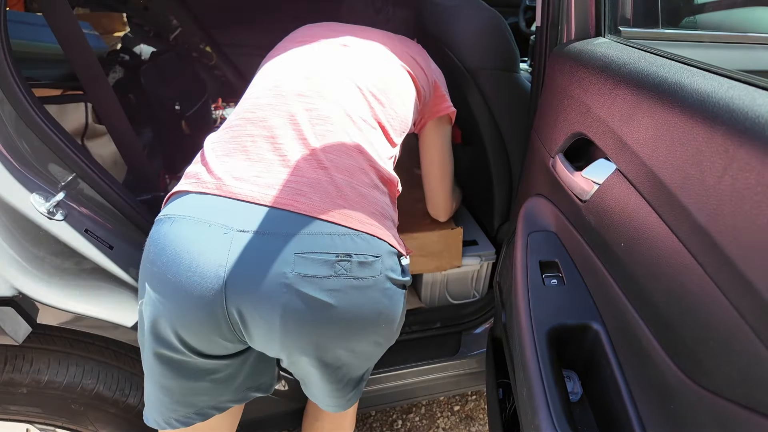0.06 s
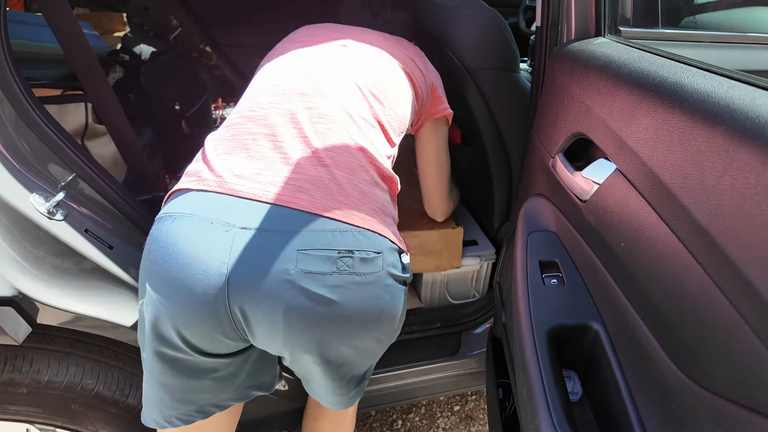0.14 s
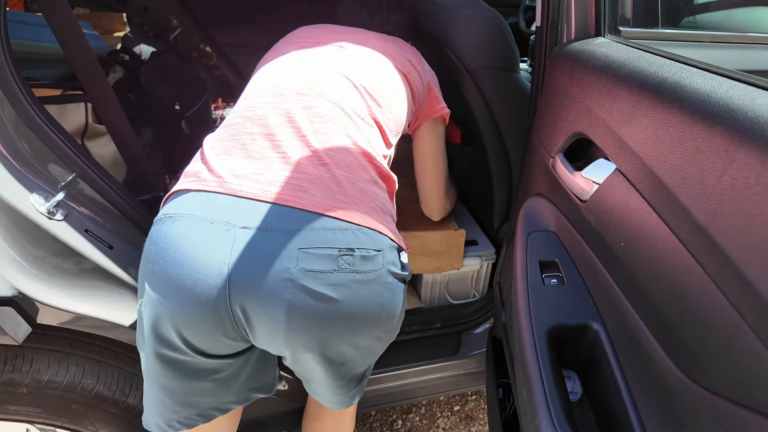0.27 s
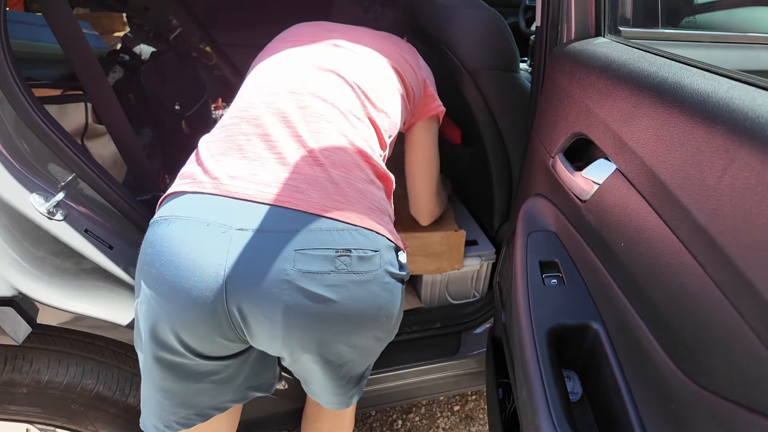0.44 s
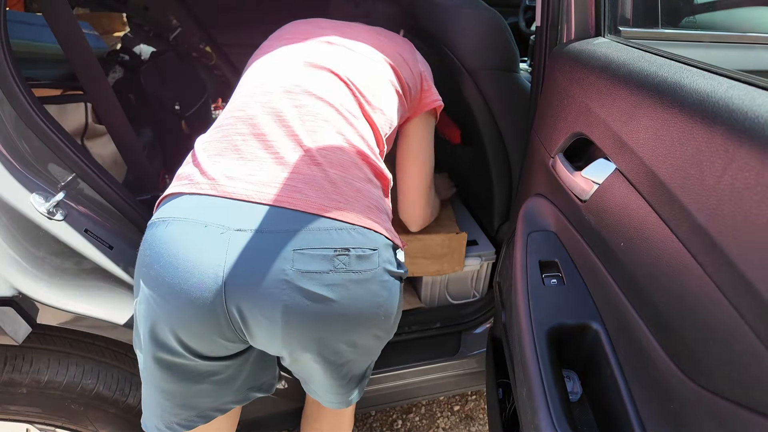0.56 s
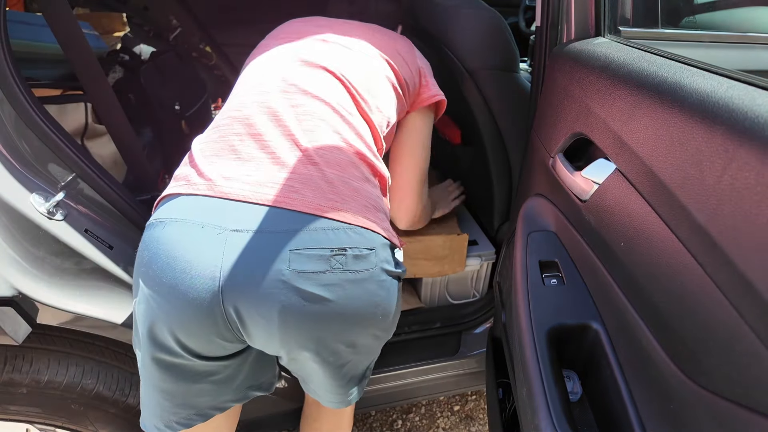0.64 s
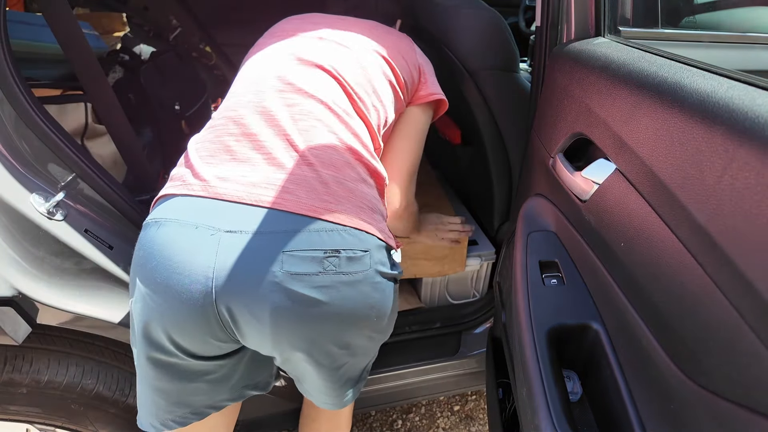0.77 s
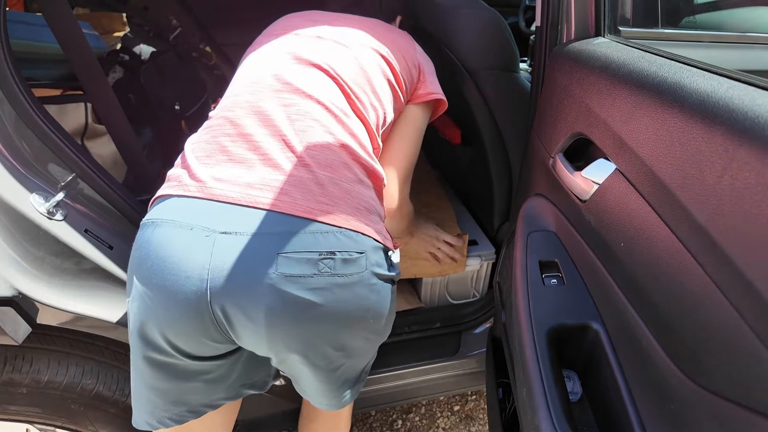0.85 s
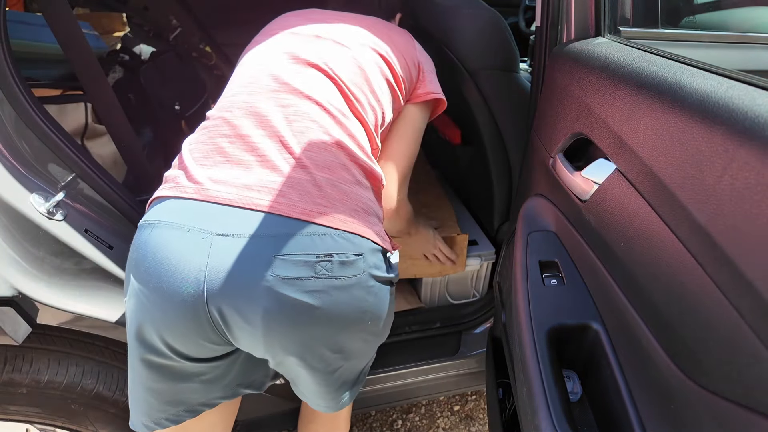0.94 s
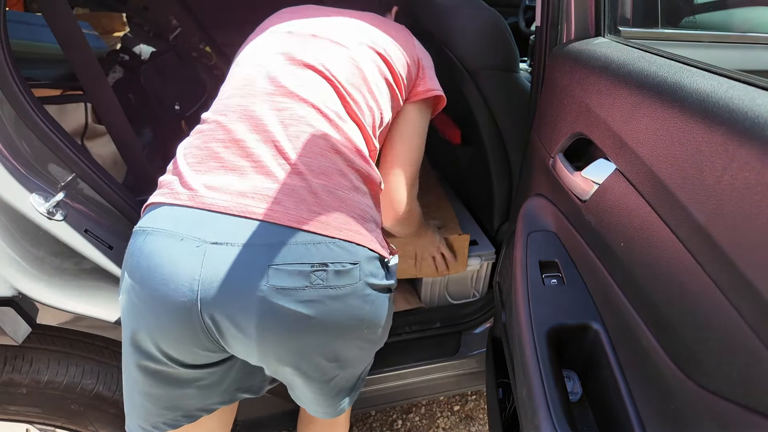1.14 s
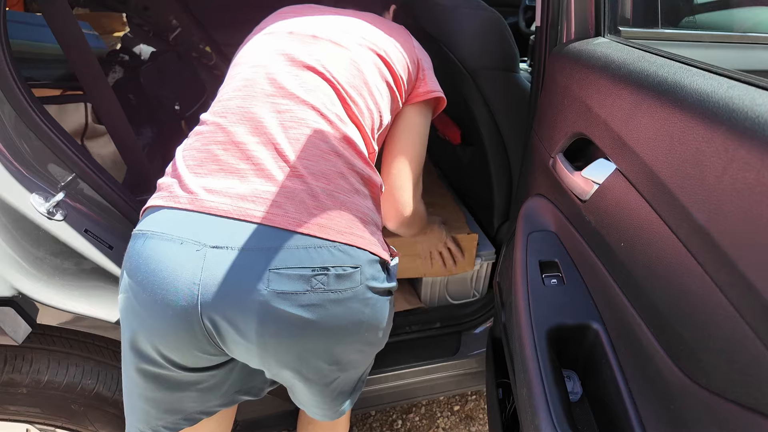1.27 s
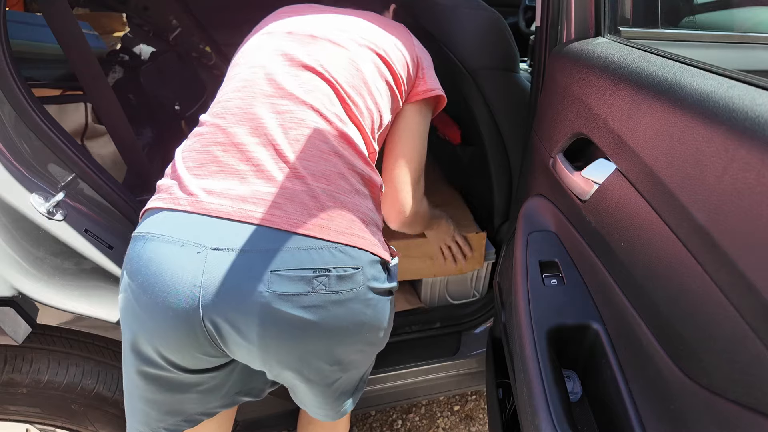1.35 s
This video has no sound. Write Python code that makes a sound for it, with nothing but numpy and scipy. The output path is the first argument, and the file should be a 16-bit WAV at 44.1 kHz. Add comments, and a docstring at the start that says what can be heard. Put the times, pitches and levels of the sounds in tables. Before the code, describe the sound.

Stiff box shoved into a parked car, hollow knocks and scrapes, then faint hand rubbing

```python
"""A stiff cardboard and wood box judders into the footwell of a parked car, knocks home and rebounds.
Knocks are decaying panel modes plus a noise crack; drag, brush and hand slides are filtered grains.
The cover's edge catches in short, crisp scrapes of rasp and ring. Panel flexes, a corner's squeaks,
creasing ticks and a soft thud add detail. The padded cabin adds a short tail, over quiet outdoor air."""
import sys
import numpy as np
from scipy import signal
from scipy.io import wavfile
from scipy.ndimage import uniform_filter1d

SR = 44100
rng = np.random.default_rng(int(sys.argv[2]) if len(sys.argv) > 2 else 0)


def materialize(psi):
    """Save the field psi as 16-bit PCM at rate SR to the path in sys.argv[1].

    A 1-D psi becomes a single channel; in a 2-D psi each row is a channel.
    """
    bounded = np.clip(np.atleast_2d(psi).T, -1, 1)
    quanta = np.round(bounded * 32767).astype(np.int16)
    wavfile.write(sys.argv[1], SR, quanta)


N = 61739
T = np.arange(N) / SR


def amp(db):
    """Decibels to gain."""
    return 10 ** (np.asarray(db) / 20)


def unit(x):
    """Scales to rms 1."""
    return x / np.sqrt(np.mean(x ** 2) + 1e-20)


def add(mix, start_s, sound):
    """Mixes a sound in at a time, in place."""
    part = mix[max(0, round(start_s * SR)):][:len(sound)]
    part += sound[:len(part)]


def colour(x, points, size=4096):
    """Causal minimum-phase filter of unit energy, its spectrum interpolated over log frequency."""
    hz, db = np.transpose(points)
    bin_hz = abs(np.fft.fftfreq(size, 1 / SR))
    bin_db = np.interp(np.log(bin_hz + 1), np.log(hz), db)  # +1 avoids log(0)
    log_gain = np.log(amp(bin_db))
    spectrum = np.exp(np.conj(signal.hilbert(log_gain)))
    impulse = np.fft.ifft(spectrum).real[:size // 2]
    return signal.fftconvolve(x, impulse / np.linalg.norm(impulse))[:len(x)]


def highpass(x, order, hz):
    """Butterworth low cut."""
    return signal.sosfilt(signal.butter(order, hz, "high", fs=SR, output="sos"), x)


def grains(rate_per_s, spread_db):
    """Friction: random tiny slips of uneven size, levelled to a nearly steady local power."""
    size = amp(spread_db * np.minimum(rng.exponential(1, N), 4))
    size = size * rng.choice([-1., 1.], N)
    slips = size * (rng.random(N) < rate_per_s / SR)
    power = abs(uniform_filter1d(slips ** 2, size=900))
    return slips / np.sqrt(power + 1e-4)


def stroke(start_s, rise_s, hold_s, release_s):
    """Linear attack, hold and release of one rubbing contact."""
    attack = np.clip((T - start_s) / rise_s, 0, 1)
    release = np.clip(1 - (T - start_s - rise_s - hold_s) / release_s, 0, 1)
    return attack * release


def strokes(table):
    """Sum of rubbing contacts, each at its level."""
    return sum(amp(db) * stroke(*shape) for *shape, db in table)


def ring(modes):
    """Decaying sines of a struck object; neighbouring modes swing in opposite directions."""
    t = T[:SR // 4]
    out = np.zeros(len(t))
    for k, (hz, db, t60_s) in enumerate(modes):
        decay = 1e-3 ** (t / t60_s)
        out += (-1) ** k * amp(db) * decay * np.sin(2 * np.pi * hz * t)
    return out


def resonate(x, modes):
    """Drives an object's modes, as a unit-energy response."""
    response = ring(modes)
    return signal.fftconvolve(x, response / np.linalg.norm(response))[:N]


CABIN_DELAY_S = .004


def cabin(x, t60_s, wet_db):
    """Dense, quickly dying reflections: random-sign impulses under an exponential decay."""
    t = T[:SR // 3]
    tail = rng.choice([-1., 1.], len(t)) * (rng.random(len(t)) < .1)
    tail = tail * (t > CABIN_DELAY_S) * np.exp(-np.log(1000) * t / t60_s)
    return x + amp(wet_db) * signal.fftconvolve(x, tail / np.linalg.norm(tail))[:N]


# knocks of the box: t/s, level/dB, contact time/ms, edge crack level/dB
BOX_KNOCKS = [(0.0206, -25.5, 1.1, -70), (0.1088, -59, 0.57, -24.5), (0.1114, -24.5, 0.45, -48),
              (0.1718, -37, 0.12, -40.5), (0.1879, -34, 0.24, -35), (0.1998, -31, 1.3, -42),
              (0.2068, -20.5, 0.63, -53), (0.318, -7, 0.06, -24), (0.3233, -17.5, 0.69, -33),
              (0.3626, -19, 1.8, -73), (0.3939, -9.5, 1.17, -45), (0.4047, -6.5, 2.65, -38),
              (0.4072, -19.5, 0.98, -46.5), (0.4449, -19, 2.7, -61), (1.276, -45.5, 1.53, -81)]
# box modes: f/Hz, level/dB, t60/s
BOX_MODES = [(132.4, -22, .11), (231.6, -.7, .042), (259, -2.2, .07), (344.8, -4.5, .1), (481.8, -23, .12),
             (538, -2.6, .058), (606.5, 1.7, .019), (665, 1.2, .03), (950, -24, .1), (1124, -18, .04),
             (1320, -33, .08)]
# edge crack spectrum: f/Hz, relative level/dB per Hz
CRACK_TONE = [(30, -12), (90, -12), (400, -30.5), (950, 8), (1300, -2), (1600, 6.5), (2300, 6), (3300, -1),
              (4500, -12.5), (7000, -22.5), (10000, -38), (16000, -53.5)]
BUILD_CYCLES, BOX_LOW_HZ = .31, 125
TRAVEL_S = .00125  # mode delay at 300 Hz
CRACK_RISE_S, CRACK_DECAY_S = 0.00072, 0.0043
CRACK_T60_S, CRACK_WET_DB = 0.11, -8


def knocks():
    """Each blow bends the panels, longer contacts ringing the high modes less; the edge adds a crack."""
    body, crack, t = np.zeros(N), np.zeros(N), T[:SR // 3]
    for start_s, db, contact_ms, crack_db in BOX_KNOCKS:
        for hz, mode_db, t60_s in BOX_MODES:
            softness = 1 / np.sqrt(1 + (2 * np.pi * hz * contact_ms / 1000) ** 2)
            build = 1 - np.exp(-(t * hz / BUILD_CYCLES) ** 2)
            decay = np.exp(-np.log(1000) * t / t60_s)
            tone = build * decay * np.sin(2 * np.pi * hz * t)
            delay_s = TRAVEL_S * np.sqrt(300 / hz)  # low modes arrive later
            add(body, start_s + delay_s, amp(db + mode_db) * softness * tone)
        shape = (1 - np.exp(-t / CRACK_RISE_S)) * np.exp(-t / CRACK_DECAY_S)
        add(crack, start_s, amp(crack_db) * shape * rng.standard_normal(len(t)))
    body = highpass(body, 3, BOX_LOW_HZ)
    return body + cabin(colour(crack, CRACK_TONE), CRACK_T60_S, CRACK_WET_DB)


# panels sticking and letting go: centre t/s, level/dB, f/Hz
PANEL_FLEXES = [(.011, -33, 626), (.05, -24.5, 570), (0.1137, -25.5, 820), (.1145, -21.5, 560),
                (.1215, -33, 950), (.193, -37.5, 1120), (0.201, -33.5, 1110), (0.2032, -24, 400),
                (0.2101, -16.5, 422), (.2115, -20, 676), (.2205, -25, 325.4)]
FLEX_CYCLES = 1.1  # centre to 1/e


def flexes():
    """A panel bulges and relaxes within a few cycles: a sine under a Gaussian."""
    out = np.zeros(N)
    for centre_s, db, hz in PANEL_FLEXES:
        t = T - centre_s
        out += amp(db) * np.exp(-(t * hz / FLEX_CYCLES) ** 2) * np.sin(2 * np.pi * hz * t)
    return out


# floor judder before its noise and ring gains: t/s, level/dB
DRAG_LEVEL = [(0, -41), (.025, -45), (.1, -33.5), (.15, -37.5), (.185, -38.5), (.22, -37.5), (.3, -36.5),
              (.36, -41), (.44, -40), (.49, -54), (.57, -70.5), (.71, -66.5), (.78, -61), (.88, -67),
              (1.05, -75), (1.21, -71.5), (1.33, -62.5), (1.4, -56)]
# drag noise spectrum: f/Hz, relative level/dB per Hz
DRAG_SPECTRUM = [(25, -53.5), (60, -19), (100, -7), (150, -3), (260, -0.5), (550, -2.5), (800, -9.5),
                 (1000, -22), (1350, -24.5), (2100, -28.5), (3400, -26.5), (4300, -36), (7000, -38),
                 (11000, -68.5), (16000, -75)]
# cardboard side on the seat: start t/s, rise/s, hold/s, release/s, level/dB
SEAT_BRUSHES = [(-0.007, 0.046, 0.015, 0.064, -49), (0.107, 0.00086, .004, 0.0043, -48.5),
                (0.202, 0.00062, 0.0056, 0.012, -48), (0.237, 0.054, 0.0082, 0.0028, -44),
                (0.306, 0.0049, .004, 0.013, -52.5)]
# brush spectrum: f/Hz, relative level/dB per Hz
BRUSH_SPECTRUM = [(500, -18), (1300, -8.5), (2100, -0.5), (3400, 2.5), (4200, -4), (5000, -1), (5600, -3.5),
                  (6600, 1), (8300, -9.5), (10000, -20), (16000, -26.5)]
SLIPS_PER_S, SLIP_SPREAD_DB = 760, 0.5
SEAT_GRAINS_PER_S, SEAT_SPREAD_DB = 12000, 1.5
DRAG_RING_DB, DRAG_NOISE_DB = -7, 0


def drag():
    """Stick-slip on the floor rumbles and rings the hollow box while its side brushes the seat."""
    level_db = np.interp(T, *np.transpose(DRAG_LEVEL))
    judder = grains(SLIPS_PER_S, SLIP_SPREAD_DB) * amp(level_db)
    brush = grains(SEAT_GRAINS_PER_S, SEAT_SPREAD_DB) * strokes(SEAT_BRUSHES)
    rumble = amp(DRAG_NOISE_DB) * colour(judder, DRAG_SPECTRUM)
    hollow = amp(DRAG_RING_DB) * resonate(judder, BOX_MODES)
    return rumble + hollow + colour(brush, BRUSH_SPECTRUM)


# corner squeaks after the rebound: start t/s, rise/s, hold/s, release/s, level/dB
CORNER_SQUEAKS = [(0.408, 0.0024, .002, 0.0077, -44), (0.411, 0.0034, 0.0037, 0.023, -60),
                  (0.436, 0.0018, .003, .012, -55)]
SQUEAK_HZ, SQUEAK_OCTAVE_DB = 3585, -18.5
SQUEAK_WAVER, SQUEAK_ROUGH = 0.012, 0.26  # rms fractions of pitch, of level


def squeaks():
    """A corner slips at a nearly steady rate: a thin, grainy tone with a faint octave."""
    waver, flutter = unit(uniform_filter1d(rng.standard_normal((2, N)), size=60))
    phase = 2 * np.pi * np.cumsum(SQUEAK_HZ * (1 + SQUEAK_WAVER * waver)) / SR
    tone = np.sin(phase) + amp(SQUEAK_OCTAVE_DB) * np.sin(2 * phase)
    return unit((1 + SQUEAK_ROUGH * flutter) * tone) * strokes(CORNER_SQUEAKS)


# creasing cardboard: t/s, level/dB, f/Hz
CREASE_TICKS = [(0.2037, -48, 6370), (0.2351, -45.5, 6860), (0.3103, -43, 6120), (0.4028, -55, 4350),
                (.4105, -56, 7000), (.4302, -56, 4460)]
TICK_DECAY_S, TICK_Q = 0.0033, 18


def ticks():
    """Each crease gives a tiny snap: decaying noise through a resonance at its own pitch."""
    out, t = np.zeros(N), T[:SR // 30]
    for start_s, db, hz in CREASE_TICKS:
        snap = signal.lfilter(*signal.iirpeak(hz, TICK_Q, fs=SR), rng.standard_normal(len(t)))
        add(out, start_s, amp(db) * unit(snap) * np.exp(-t / TICK_DECAY_S))
    return out


# soft thud on the car floor: t/s, level/dB
FLOOR_THUDS = [(.727, -42)]
# floor modes: f/Hz, level/dB, t60/s
FLOOR_MODES = [(45, -8, .15), (85, -14, .16), (135, -16, .12), (262, -4, .19), (380, -4.5, .14),
               (535, -11, .09)]


def thuds():
    """The box's weight settles on the car floor, ringing its modes."""
    out = np.zeros(N)
    for start_s, db in FLOOR_THUDS:
        add(out, start_s, amp(db) * ring(FLOOR_MODES))
    return out


# hands on the cover: start t/s, rise/s, hold/s, release/s, level/dB
HAND_SLIDES = [(0.455, 0.056, 0.061, 0.018, -45), (0.575, 0.027, 0.033, 0.02, -48),
               (0.646, 0.017, 0.0099, 0.021, -55.5), (0.675, 0.017, 0.063, 0.061, -69),
               (.78, 0.023, .012, 0.027, -63.5), (1.087, 0.031, 0.015, 0.018, -62.5),
               (1.123, 0.014, 0.017, 0.046, -49), (1.171, 0.026, 0.0073, 0.04, -52),
               (1.301, 0.048, .05, 0.064, -65.5)]
# slide spectrum: f/Hz, relative level/dB per Hz
SLIDE_SPECTRUM = [(300, -15), (560, -9), (850, -21.5), (1100, -9.5), (1330, -12.5), (1650, -1), (2200, -2),
                  (2450, -3), (2950, 5), (3900, -4.5), (4700, -3), (5400, -5.5), (6300, -1.5), (7900, -7),
                  (9300, -9.5), (10600, -25), (16000, -26.5)]
GRAINS_PER_S, GRAIN_SPREAD_DB = 19000, 2.5


def slides():
    """Fine friction of skin on cardboard."""
    friction = grains(GRAINS_PER_S, GRAIN_SPREAD_DB) * strokes(HAND_SLIDES)
    return colour(friction, SLIDE_SPECTRUM)


# cover edge catching: start t/s, rise/s, hold/s, release/s, rasp level/dB, ring level/dB, edge f/Hz
EDGE_SCRAPES = [(0.906, 0.00046, .007, .012, -58.5, -51.5, 7320),
                (0.921, 0.0012, 0.0012, 0.0052, -49.5, -63, 2814),
                (0.927, 0.00058, .0012, 0.0018, -33, -67, 7400),
                (0.9294, 0.00079, 0.0022, .003, -33.5, -47, 1900),
                (0.9375, 0.0028, .001, 0.0032, -31.5, -53, 5180),
                (0.94, .002, 0.0044, 0.015, -39.5, -58, 8920),
                (0.951, 0.00087, .001, 0.0081, -52, -40, 1030),
                (0.969, 0.0026, 0.019, 0.0069, -58, -63, 7100),
                (.985, 0.00055, 0.00078, .004, -42.5, -66, 7300),
                (.986, 0.0079, 0.00875, 0.0011, -39.5, -37, 8430)]
# rasp spectrum: f/Hz, relative level/dB per Hz
RASP_SPECTRUM = [(300, -46), (750, -23), (980, 2.5), (1400, -4.5), (1900, 6), (2800, 7.5), (3500, -1.5),
                 (4100, -5.5), (5150, 6.5), (6200, 2), (7300, 3.5), (8400, 1), (9300, 3), (11000, -10.5),
                 (16000, -24)]
# cover modes: f/Hz, relative level/dB, t60/s
COVER_MODES = [(985, -15, .03), (1165, -3, .03), (1526, 0, .033), (1850, -2, .022), (2280, -1, .028),
               (2730, -2, .022), (3120, -3, .015), (3592, -2, .02)]
SNAPS_PER_S, SNAP_SPREAD_DB = 12000, 1.5
EDGE_Q, EDGE_DB, COVER_LOW_HZ = 31, 3.5, 965


def scrapes():
    """Snapping fibres rasp, flick the edge and ring the stiff cover, too small to radiate bass."""
    snaps = grains(SNAPS_PER_S, SNAP_SPREAD_DB)
    rasp, push = np.zeros(N), np.zeros(N)
    for *shape, rasp_db, ring_db, hz in EDGE_SCRAPES:
        burst = snaps * stroke(*shape)
        flick = signal.lfilter(*signal.iirpeak(hz, EDGE_Q, fs=SR), burst)
        rasp += amp(rasp_db) * (burst + amp(EDGE_DB) * flick)
        push += amp(ring_db) * burst
    sound = colour(rasp, RASP_SPECTRUM) + resonate(push, COVER_MODES)
    return highpass(sound, 14, COVER_LOW_HZ)


# still outdoor air spectrum: f/Hz, relative level/dB per Hz
AIR_SPECTRUM = [(20, -18), (60, -2.5), (130, 2.5), (300, -9), (800, -17.5), (1500, -17), (3000, -12),
                (4300, -21.5), (6500, -16.5), (10000, -28), (16000, -34)]
AIR_DB = -63.5


def air():
    """Still outdoor air: steady coloured noise."""
    return amp(AIR_DB) * colour(rng.standard_normal(N), AIR_SPECTRUM)


BOX_T60_S, BOX_WET_DB = .1, -22
COVER_T60_S, COVER_WET_DB = .1, -14.5


def scene():
    """Box and cover in the cabin, over quiet air."""
    box = knocks() + flexes() + drag() + squeaks() + ticks() + thuds()
    box = cabin(box, BOX_T60_S, BOX_WET_DB)
    cover = cabin(slides() + scrapes(), COVER_T60_S, COVER_WET_DB)
    return (box + cover + air())[None]


MIC_LOW_HZ, BAND_LIMIT_HZ = 110, 16250


def record(dry):
    """The microphone's bass roll-off, then the band limit."""
    thin = highpass(dry, 2, MIC_LOW_HZ)
    lowpass = signal.firwin(511, BAND_LIMIT_HZ, window=("kaiser", 9), fs=SR)
    return signal.oaconvolve(thin, lowpass[None], "same")


dry = scene()
out = record(dry)
materialize(out)
```